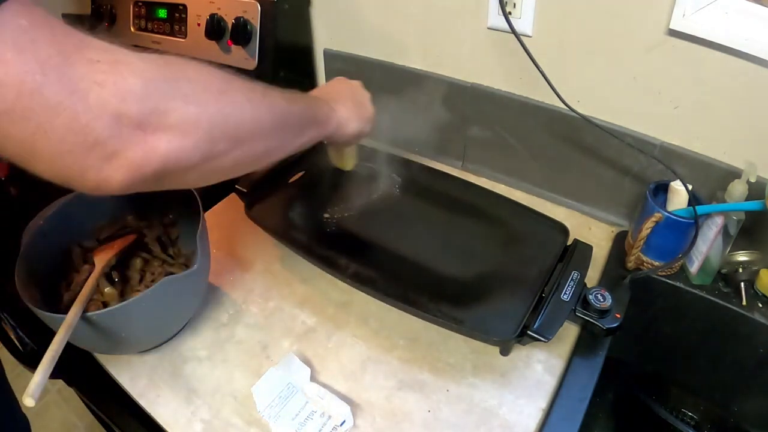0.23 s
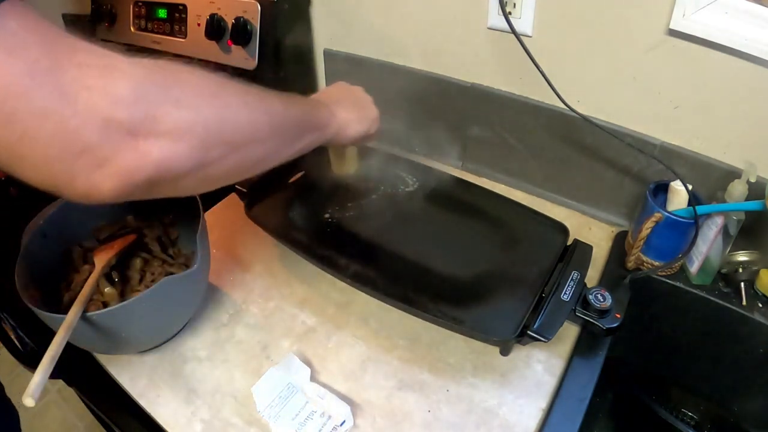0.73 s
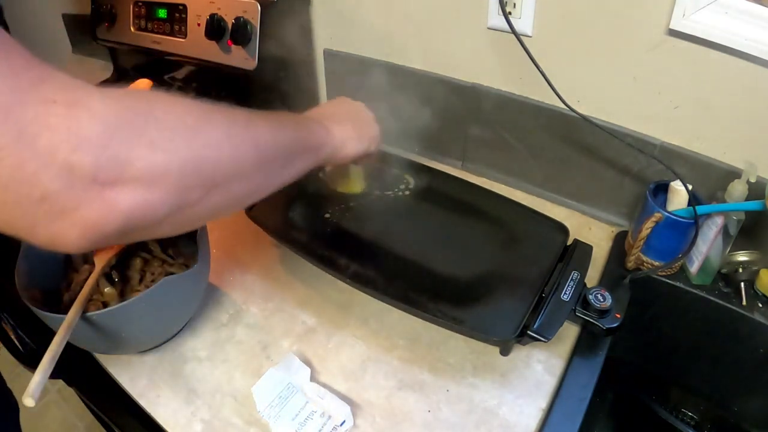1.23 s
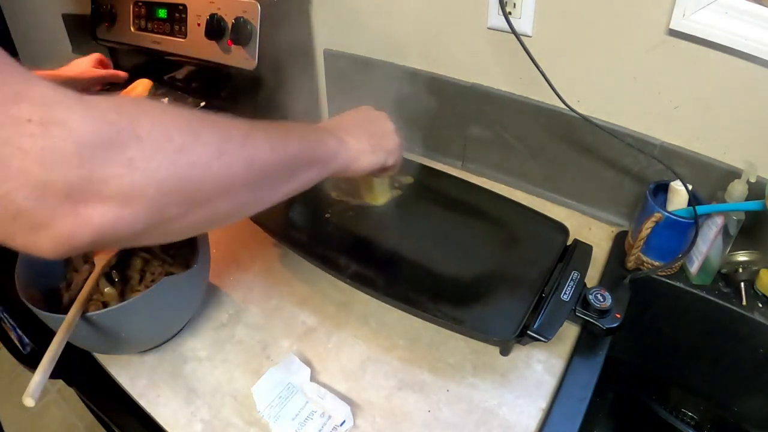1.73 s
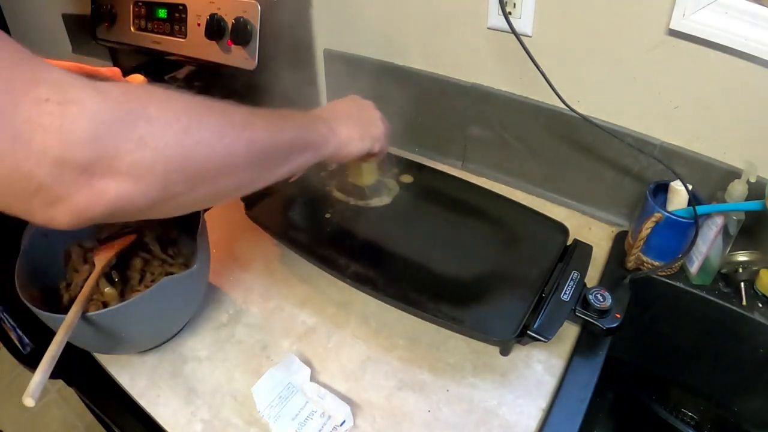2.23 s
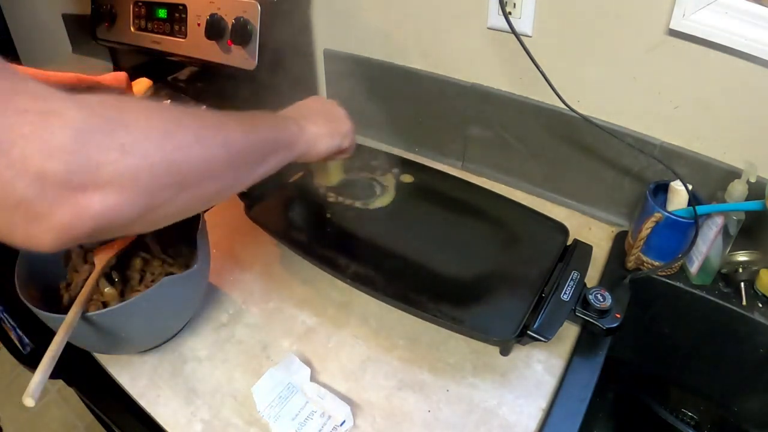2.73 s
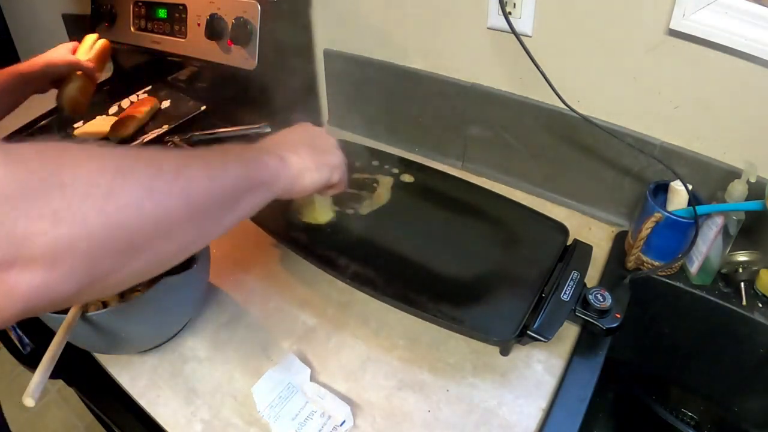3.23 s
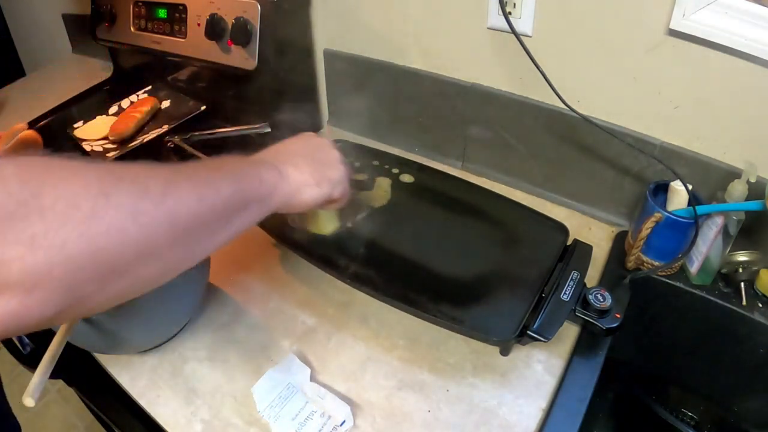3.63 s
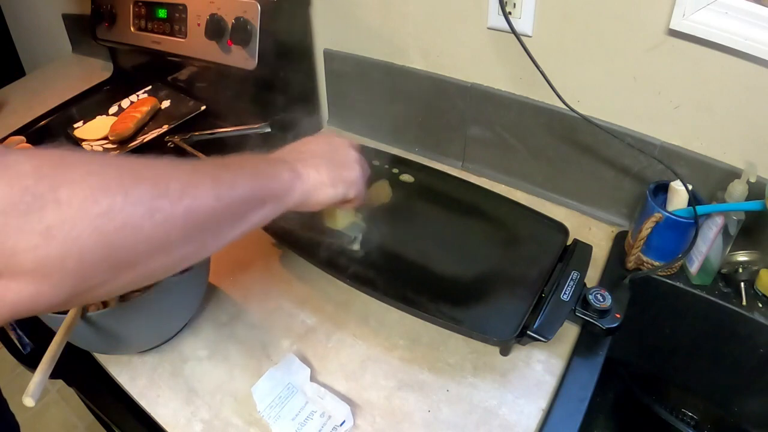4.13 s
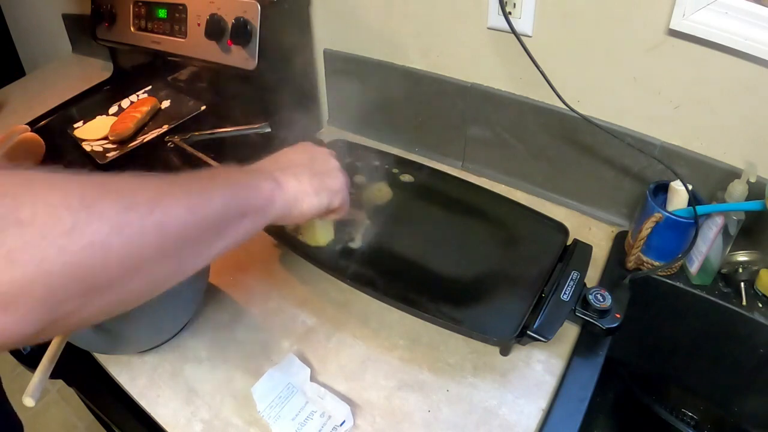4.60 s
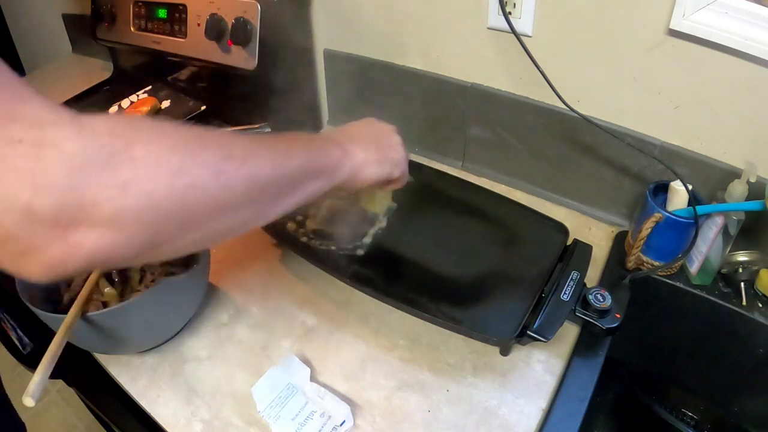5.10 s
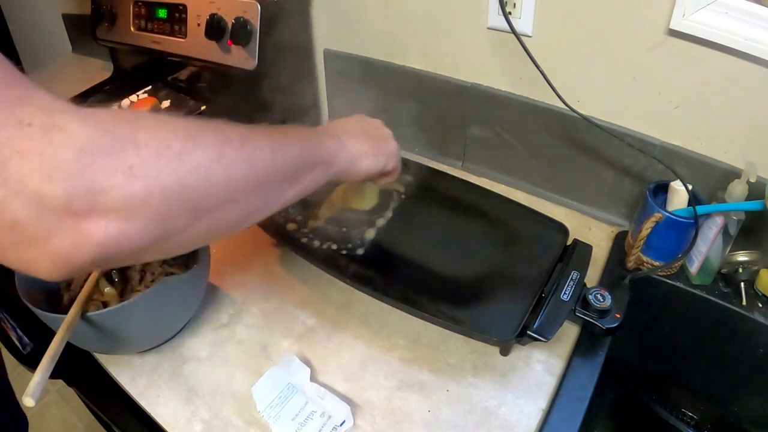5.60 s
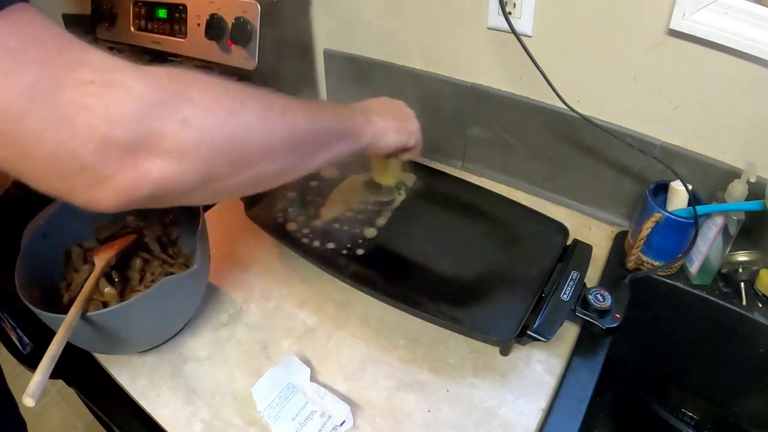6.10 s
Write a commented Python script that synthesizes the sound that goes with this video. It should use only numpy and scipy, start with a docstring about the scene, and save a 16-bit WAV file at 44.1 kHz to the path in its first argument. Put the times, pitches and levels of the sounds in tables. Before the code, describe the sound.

Close, nearly centred sizzling in a small, fairly dry kitchen. Steam bursts from under butter on hot metal, strongest right away, with dense crackles and sharp pops. Strokes follow as weaker puffs, a pause leaves quiet fizzing, then a second run of strokes splutters strongly before easing into soft, airy frying with scattered dry ticks. The metal plate adds a slight hollow ring at times; low appliance noise sits far beneath.

```python
"""In a small kitchen, a stick of butter is rubbed in circles over a hot electric griddle, with one pause.
Steam under the stick bursts out in crackles: random short resonant pulses that swell with each stroke.
Single large bubbles pop at set times, and the melted film fizzes as thousands of finer pulses.
The plate rings along, the room reflects it all, and appliances hum faintly as shaped noise."""
import sys
import numpy as np
from scipy import signal
from scipy.fft import rfft, irfft
from scipy.io import wavfile

SR = 44100
rng = np.random.default_rng(int(sys.argv[2]) if len(sys.argv) > 2 else 0)


def unload_audio(sound):
    """Save the sound as a 16-bit wav file, at the path given as the first command line argument."""
    columns = np.transpose(np.atleast_2d(sound))
    # keep every value between -1 and 1, then stretch to whole-number steps
    steps = np.round(np.clip(columns, -1, 1) * 32767)
    wavfile.write(sys.argv[1], SR, steps.astype(np.int16))


N = 280035


def amp(db):
    """Decibels to gain."""
    return 10 ** (np.asarray(db) / 20)


def unit(x):
    """Scales to rms 1."""
    return x / np.sqrt(np.mean(x ** 2) + 1e-20)


def curve(rows):
    """A control curve at every sample."""
    return np.interp(np.arange(N) / SR, *np.transpose(rows))


def read(points, hz):
    """Reads a spectrum table on a log-frequency axis."""
    f, value = np.transpose(points)
    return np.interp(np.log(hz + 1), np.log(f), value)


def add(mix, s, sound):
    """Mixes a sound in at time s."""
    part = mix[max(round(s * SR), 0):][:len(sound)]
    part += sound[:len(part)]


def colour(x, points, size=2048):
    """Causal minimum-phase equaliser, so that clicks keep their sharp front."""
    log_gain = np.log(amp(read(points, abs(np.fft.fftfreq(size, 1 / SR)))))
    taps = np.fft.ifft(np.exp(np.conj(signal.hilbert(log_gain)))).real
    return signal.oaconvolve(x, taps[:size // 2])[:len(x)]


def ring(x, modes):
    """Sums the outputs of a set of resonances driven by one sound."""
    out = np.zeros(N)
    for hz, width_hz, level_db in modes:
        b, a = signal.iirpeak(hz, hz / width_hz, SR)
        out += amp(level_db) * signal.lfilter(b, a, x)
    return out


# shape of the air and appliance noise: freq_hz, relative_density_db
ROOM_NOISE = [(15, -4), (24, -8), (32, -13.5), (50, 3.5), (70, -6), (100, -4), (150, -13.5), (250, -14.5),
              (450, -16.5), (800, -15), (1400, -20), (3000, -31), (15000, -60)]
# appliance hum and whines: pitch_hz, level_db, width_hz
HUM = [(59.03, -62, 0.59), (123.4, -68, 3.7), (489, -70.5, 4.7), (672, -70.5, 11), (1400, -66, 7.3)]


def appliances():
    """Low room noise with hum and faint wavering whines: narrow bands of random-phase noise."""
    hz = np.fft.rfftfreq(N, 1 / SR)
    power = (amp(-57.0) * unit(amp(read(ROOM_NOISE, hz)))) ** 2
    for pitch_hz, level_db, width_hz in HUM:
        peak = 1 / (1 + (2 * (hz - pitch_hz) / width_hz) ** 2)
        power += (amp(level_db) * unit(peak)) ** 2
    phase = 2 * np.pi * rng.random(len(hz))
    return irfft(np.sqrt(power * N) * np.exp(1j * phase), N)


# reverberation time of the kitchen: freq_hz, t60_s
KITCHEN = [(200, 0.07), (1500, 0.12), (5000, 0.31), (15000, 0.17)]


def kitchen(x, gap_s):
    """A diffuse noise tail that builds up over the gap; its treble near 5 kHz outlasts its bass."""
    size = SR // 2
    hz, t, z = signal.stft(rng.standard_normal(size), SR, nperseg=256)
    decay = amp(-60 * t / read(KITCHEN, hz)[:, None])
    tail = signal.istft(z * decay, SR)[1][:size]
    tail *= 1 - np.exp(-(np.arange(size) / SR / gap_s) ** 2)
    return signal.oaconvolve(x, tail / np.linalg.norm(tail))[:N]


# strokes of the stick over fresh hot metal:
# peak_s, steam_db, rise_s, fall_s, bubble_pitch_hz, fizz_db
STROKES = [(0.059, -21.5, 0.23, .16, 4670, -23.5), (0.552, -29, 0.18, 0.108, 2132, -50.5),
           (1.05, -27, 0.094, 0.055, 2248, -33), (1.432, -29.5, 0.12, 0.11, 2593, -43),
           (1.569, -34, 0.15, 0.066, 2858, -32), (1.889, -31, 0.042, 0.051, 2153, -36),
           (2.719, -45, 0.13, 0.028, 3000, -38.5), (3.056, -26.5, 0.01, 0.094, 2630, -49),
           (3.24, -36, 0.1, 0.063, 3077, -40), (3.478, -24.5, 0.08, .14, 3143, -30.5),
           (3.912, -23.5, .08, 0.087, 2900, -35), (4.291, -22, 0.13, 0.071, 2922, -28),
           (4.459, -34.5, 0.0324, 0.11, 3140, -42), (4.66, -34, 0.2, 0.11, 3075, -40),
           (4.95, -27, .11, 0.12, 3030, -53), (5.138, -34, 0.043, 0.16, 3510, -41)]


def reach():
    """The hand circles once per stroke: +1 at the peak of a stroke, -1 halfway to the next."""
    turns = curve([(stroke[0], turn) for turn, stroke in enumerate(STROKES)])
    return np.cos(2 * np.pi * turns)


# reflections from the counter and the stove: delay_s, gain
ECHOES = [(.0023, 0.069), (.0033, 0.01)]
WALL_DELAY_S = .00078  # extra path of the wall's reflection at the start
WALL_DRIFT_S_PER_S = .00008  # the delay grows as the stick works forward
WALL_SWING_S = .00012  # and swings with each stroke


def reflect(x, wall_gain):
    """The wall answers with a delay that follows the hand, other near surfaces with fixed ones."""
    t = np.arange(N) / SR
    wall_delay_s = WALL_DELAY_S + WALL_DRIFT_S_PER_S * t + WALL_SWING_S * reach()
    out = x + wall_gain * np.interp(t - wall_delay_s, t, x)
    for delay_s, gain in ECHOES:
        out += gain * np.interp(t - delay_s, t, x)
    return out


STROKE_DROP_DB = 10  # drop from a stroke's peak, one rise before it or one fall after it


def swell(peak, rise, fall):
    """Gain of one stroke: it builds up to its peak and dies away."""
    t = np.arange(N) / SR - peak
    return amp(-STROKE_DROP_DB * np.maximum(-t / rise, t / fall))


# the stick rests on the plate: down_s, lifted_s, steam_db
TOUCHES = [(0, 2.1, -41), (3.04, 5.45, -42.5)]
TOUCH_FADE_S = 0.19
SIMMER_DB = -54  # crackle of the puddle, with or without the stick


def steam():
    """Steam flow in dB: a simmer, more while the stick is down, and a gush with each stroke."""
    t = np.arange(N) / SR
    power = amp(SIMMER_DB) ** 2
    for down, lifted, db in TOUCHES:
        contact = np.clip(np.minimum(t - down, lifted - t) / TOUCH_FADE_S, 0, 1)
        power = power + (amp(db) * contact) ** 2
    for peak, db, rise, fall, _, _ in STROKES:
        power = power + (amp(db) * swell(peak, rise, fall)) ** 2
    return 10 * np.log10(power)


SPUTTER_DB, SPUTTER_PER_S = 1.18, 8  # rms depth and rate of the uneven puffs of steam


def sputter():
    """Random gain that swells and sags several times a second."""
    rate = np.fft.rfftfreq(N, 1 / SR) / SPUTTER_PER_S
    band = rate / (1 + rate ** 4)
    wander = irfft(rfft(rng.standard_normal(N)) * band, N)
    return amp(SPUTTER_DB * unit(wander))


def burst(hz, q, spray_db, spray_s, size=1024):
    """One bubble: a pulse of about one cycle, then a brief spray as its skin tears up."""
    t = np.arange(size) / SR
    droplets = rng.standard_normal(size) ** 3  # a few stand out from the rest
    spray = droplets * np.exp(-t / spray_s) * (1 - np.exp(-t * hz))
    push = signal.unit_impulse(size) + amp(spray_db) * spray / np.linalg.norm(spray)
    s = 1j * np.fft.rfftfreq(2 * size, 1 / SR) / hz
    resonance = s / (s * s + s / q + 1)
    rounding = 1 + s * 900 / hz  # large bubbles open slowly, which dulls their front
    pulse = irfft(rfft(push, 2 * size) * resonance / rounding)[:size]
    return pulse / np.linalg.norm(pulse)


def boil(per_s, spread_db, range_db, hz, octaves, q, spray_db, spray_s, count=72):
    """Random bubbles of many strengths and pitches that share a steady supply of steam."""
    at = np.flatnonzero(rng.random(N) < per_s / SR)
    strength = np.zeros(N)
    strength[at] = amp(np.minimum(spread_db * rng.exponential(1, N)[at], range_db))
    # even out the local power, so that crowded bubbles are weaker
    window = signal.windows.hann(SR // 14)
    local_power = abs(signal.oaconvolve(strength ** 2, window / window.sum(), "same"))
    strength /= np.sqrt(local_power + 1e-6)
    pitches = np.geomspace(900, 14000, count)
    shapes = [burst(f, q, spray_db, spray_s) for f in pitches]
    wanted_hz = hz * 2 ** (octaves * rng.standard_normal(N))
    kinds = np.searchsorted(pitches, wanted_hz).clip(0, count - 1)
    out = np.zeros(N)
    for n in at.tolist():
        add(out, n / SR, strength[n] * shapes[kinds[n]])
    return out


# fizz of the puddle over time: time_s, level_db
PUDDLE = [(0, -32.5), (2.15, -44.5), (2.38, -42.5), (2.58, -49), (2.85, -41.5), (4.9, -41), (5.3, -45),
          (5.43, -36), (6.35, -40)]
# colour of the fizz: freq_hz, gain_db
FIZZ_COLOUR = [(200, -15.5), (900, -3.5), (2000, -4.5), (3100, -3), (4200, -3.5), (7000, -1), (10000, -3.5),
               (15500, -11)]
FIZZ_LAG_S = 0.022  # the fresh smear fizzes just after the steam escapes


def fizz():
    """Thousands of tiny bubbles in the puddle and in each stroke's fresh smear, some sharper than others."""
    power = amp(curve(PUDDLE)) ** 2
    for peak, _, rise, fall, _, db in STROKES:
        power = power + (amp(db) * swell(peak + FIZZ_LAG_S, rise, fall)) ** 2
    bubbles = boil(per_s=3100, spread_db=2.0, range_db=16, hz=6767, octaves=.9,
                   q=0.56, spray_db=2.0, spray_s=0.0021)
    return colour(bubbles, FIZZ_COLOUR) * np.sqrt(power)


# large bubbles bursting: start_s, level_db (before the pop colour), pitch_hz
POPS = [(0.0617, -11.5, 4160), (0.1485, -12.5, 4230), (0.221, -13.5, 3640), (0.2472, -14, 3030),
        (0.2815, -16, 3550), (0.3129, -16, 2440), (0.322, -22.5, 2310), (0.3418, -14.5, 3830),
        (0.3794, -17, 3240), (0.3998, -18.5, 4800), (0.5012, -21, 3140), (0.5373, -20, 1800),
        (0.5629, -19, 2780), (0.6192, -23, 1990), (0.7334, -18.5, 3350), (0.7859, -26.5, 1940),
        (0.846, -19, 1890), (0.8782, -22.5, 1660), (0.9075, -21.5, 2700), (1.0735, -22, 2320),
        (1.287, -24, 2130), (1.3963, -24.5, 2020), (1.5576, -20, 3550), (1.6565, -27.5, 1830),
        (1.8126, -24.5, 1550), (1.8257, -17.5, 2420), (1.9068, -20, 2120), (1.9719, -18, 4600),
        (2.0154, -24, 3800), (2.7036, -21.5, 2930), (2.7275, -25.5, 3040), (3.0495, -27, 2730),
        (3.0673, -20.5, 2870), (3.2237, -22, 3420), (3.3587, -15.5, 2605), (3.6482, -19.5, 3240),
        (3.692, -22, 4860), (3.7844, -19.5, 2670), (3.87, -15.5, 2500), (3.9069, -12.5, 2920),
        (3.9467, -13.5, 3330), (4.0827, -34, 3180), (4.1887, -15.5, 2920), (4.254, -14.5, 2760),
        (4.337, -16, 2370), (4.4318, -21.5, 3230), (4.5371, -14.5, 2230), (4.5832, -17, 2620),
        (4.7304, -20, 2740), (4.7866, -26.5, 3770), (4.9, -14.5, 3250), (4.928, -21.5, 3320),
        (5.0112, -19, 2640), (5.053, -20.5, 2480), (5.293, -22, 2970), (5.356, -25.5, 2360),
        (5.4043, -22.5, 4350), (5.5743, -20, 3900), (5.7918, -18, 3000), (5.9482, -30, 3430),
        (6.0155, -31, 4900), (6.167, -31, 3480)]
LULL_DB, LULL_S = 2, 0.012  # a swelling bubble holds back the steam just before it bursts


def lulls():
    """Gain of the crackle, which sinks ahead of each large pop."""
    t = np.arange(N) / SR
    held = sum(np.exp(-abs(t - s) / LULL_S) * (t < s) for s, _, _ in POPS)
    return amp(-LULL_DB * np.minimum(held, 1))


# colour and gain of the large pops: freq_hz, gain_db
POP_COLOUR = [(100, 23), (400, 21), (580, 16), (900, 21.5), (2000, 16.5), (4000, 14), (9000, 18.5),
              (15500, 9.5)]
DRY_POP_DB, SPRAY_SLOPE = -43.5, 0.42  # above this steam level spray outweighs snap (dB per dB)
SPRAY_RANGE_DB = (-2, 4)


def pops(steam_db):
    """Large bubbles splutter amid heavy steam and snap dryly on the open film."""
    out = np.zeros(N)
    for s, db, hz in POPS:
        excess_db = steam_db[round(s * SR)] - DRY_POP_DB
        spray_db = np.clip(SPRAY_SLOPE * excess_db, *SPRAY_RANGE_DB)
        add(out, s, amp(db) * burst(hz, q=1.29, spray_db=spray_db, spray_s=0.0035))
    return colour(out, POP_COLOUR)


# colour of the crackle: freq_hz, gain_db
CRACKLE_COLOUR = [(100, -9), (250, -0.5), (420, -7.5), (560, -8), (760, -1.5), (980, -0.5), (1150, -4.5),
                  (1320, 0), (1800, -3.5), (2400, 0), (4000, -1.5), (9000, -1), (15500, -7.5)]
# the pocket under the stick rings in the first gush of steam: pitch_hz, width_hz, level_db
POCKET = [(2090, 47, 10)]


def crackle(steam_db):
    """Bubbles squeezed out from under the stick; more steam makes more of them."""
    per_s = 340 * amp(.7 * (steam_db - steam_db.mean()))
    pitch_hz = curve([(peak, hz) for peak, _, _, _, hz, _ in STROKES])
    bubbles = boil(per_s, spread_db=4.5, range_db=19, hz=pitch_hz, octaves=.65,
                   q=0.89, spray_db=-2.5, spray_s=0.0045)
    bubbles = colour(bubbles, CRACKLE_COLOUR) * amp(steam_db)
    first_gush = np.exp(-(np.arange(N) / SR / 0.28) ** 2)
    return bubbles + ring(bubbles * first_gush, POCKET)


# modes of the griddle plate: pitch_hz, width_hz, level_db
PLATE = [(384, 90, 0), (990, 100, -10), (1260, 160, -6.5), (1530, 52, -3)]
# how firmly the stick couples the bubbles to the plate: time_s, gain_db
FIRMNESS = [(.2, -21), (.32, 7), (1.85, -7), (1.97, -12.5), (3.4, 5.5), (3.8, -34)]


def griddle_plate(under_stick):
    """The metal plate resonates with the bubbles as far as the stick couples them to it."""
    return ring(under_stick * amp(curve(FIRMNESS)), PLATE)


def scene():
    """The griddle lies straight ahead; the room answers differently at the two ends of a stroke."""
    steam_db = steam()
    puffs = sputter()
    under_stick = crackle(steam_db) * puffs * lulls() + pops(steam_db)
    sources = under_stick + griddle_plate(under_stick) + fizz() * puffs
    butter = reflect(sources, wall_gain=0.1)
    # crossfade between two reverb tails as the hand moves
    place = np.pi / 4 * (1 + reach())
    room = sum(kitchen(butter * share, gap_s=0.0019) for share in (np.cos(place), np.sin(place)))
    mid = butter + amp(-9.5) * room + appliances()
    side = amp(-23) * appliances()
    return np.array([mid + side, mid - side])


# response of the microphone in its case: freq_hz, gain_db
MICROPHONE = [(2900, 0.5), (3550, 5), (3850, 5.5), (4200, 6), (4650, 0), (5100, -8.5), (5500, -4),
              (5900, 4), (6300, -1), (6900, -3), (9000, 0), (11200, 3), (13500, 2.5), (15800, 3)]
EDGE_HZ = 15980  # upper band limit


def record(dry):
    """Microphone colour, then the band limit."""
    heard = np.array([colour(channel, MICROPHONE) for channel in dry])
    low_pass = signal.firwin(511, EDGE_HZ, window=("kaiser", 8), fs=SR)
    return signal.oaconvolve(heard, low_pass[None], "same", axes=1)


dry = scene()
out = record(dry)
unload_audio(out)
```